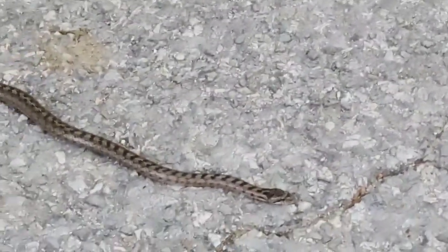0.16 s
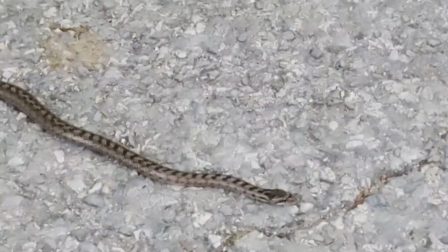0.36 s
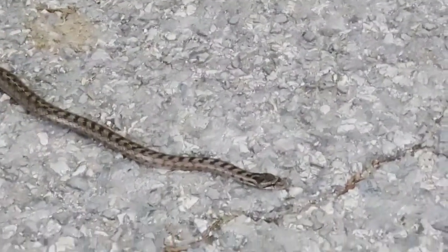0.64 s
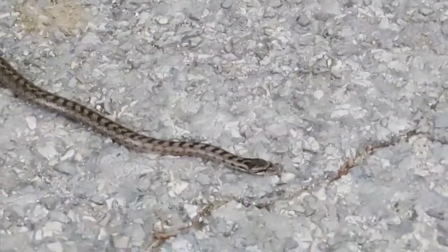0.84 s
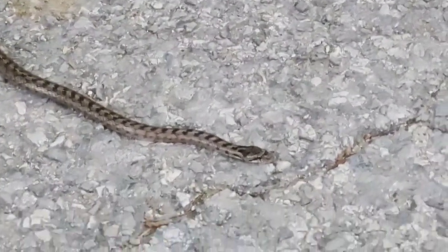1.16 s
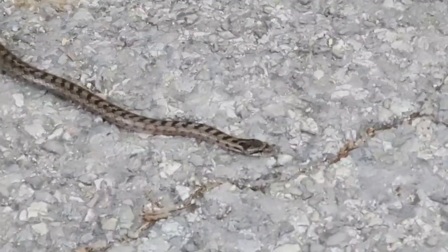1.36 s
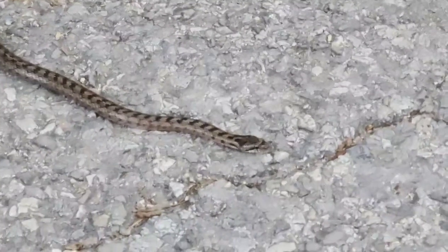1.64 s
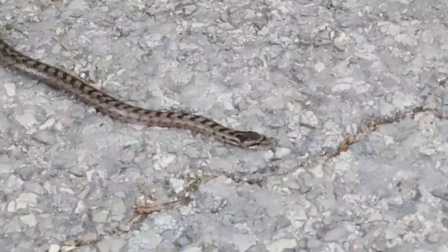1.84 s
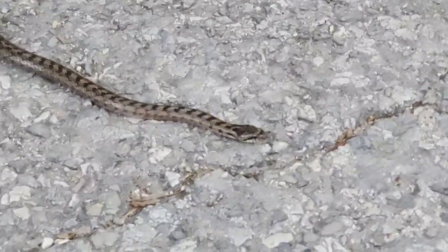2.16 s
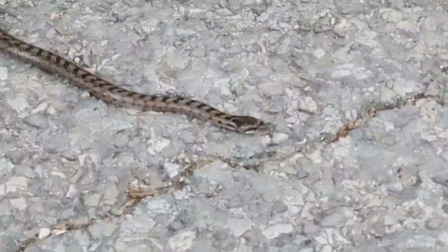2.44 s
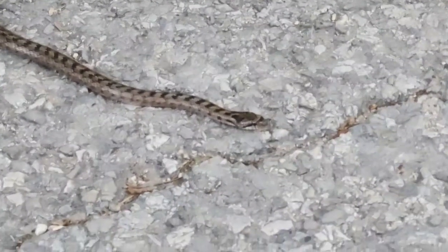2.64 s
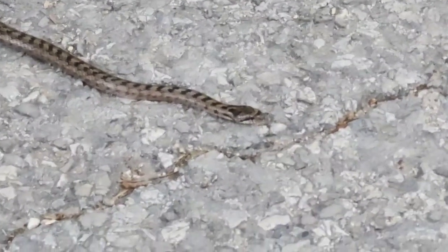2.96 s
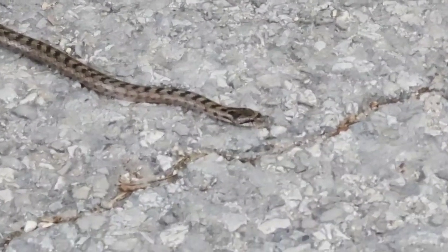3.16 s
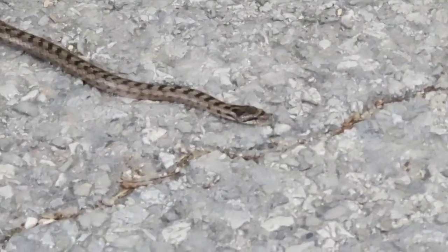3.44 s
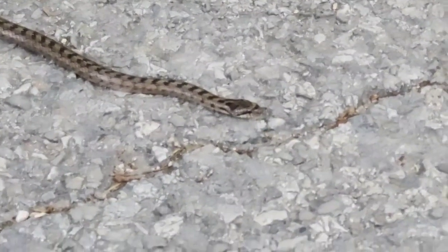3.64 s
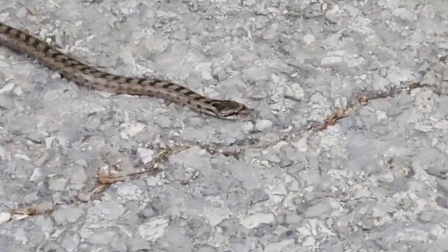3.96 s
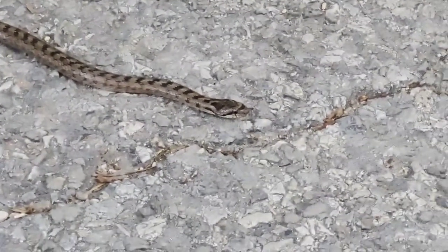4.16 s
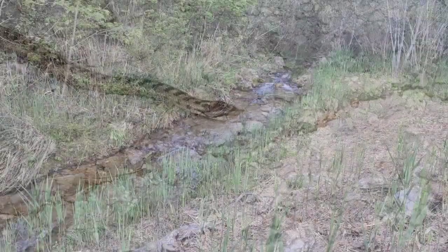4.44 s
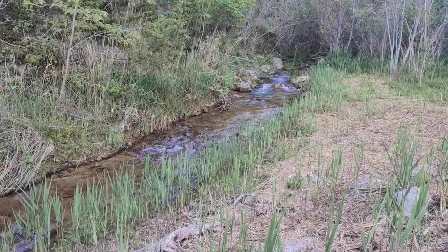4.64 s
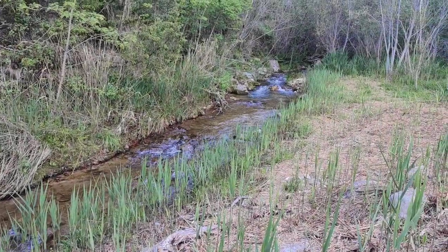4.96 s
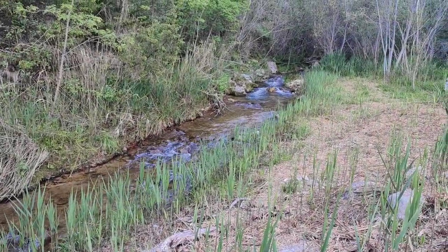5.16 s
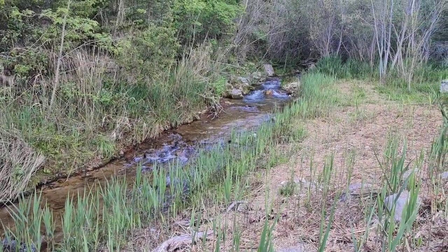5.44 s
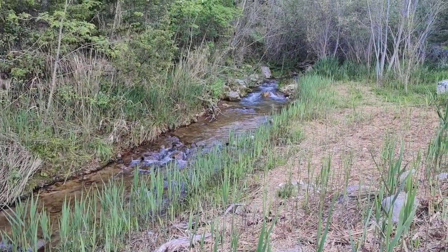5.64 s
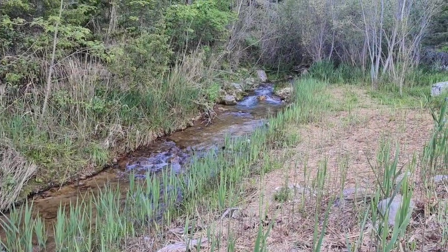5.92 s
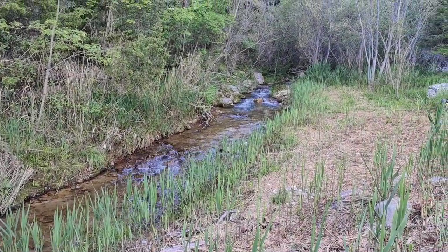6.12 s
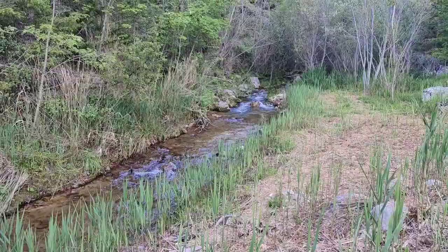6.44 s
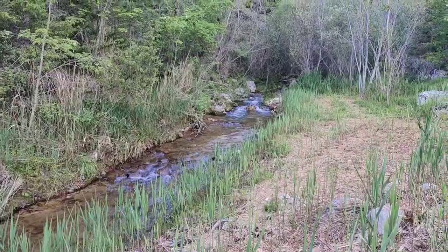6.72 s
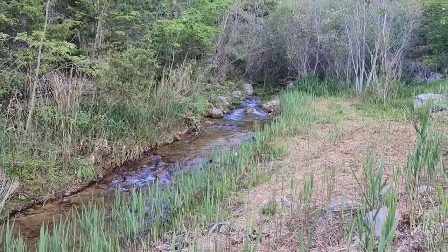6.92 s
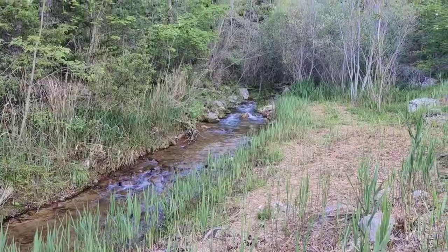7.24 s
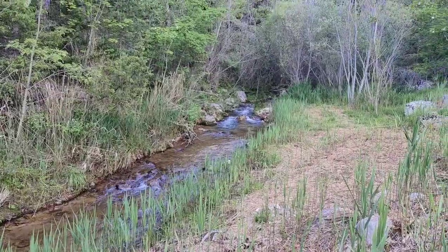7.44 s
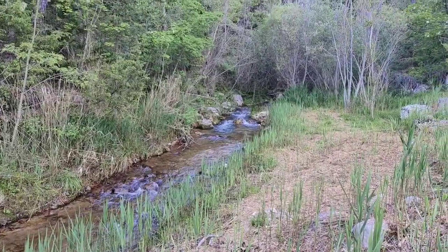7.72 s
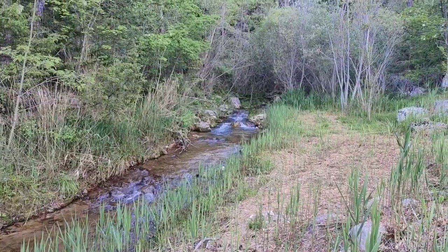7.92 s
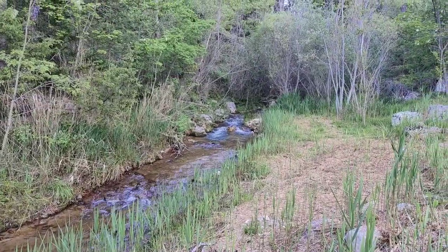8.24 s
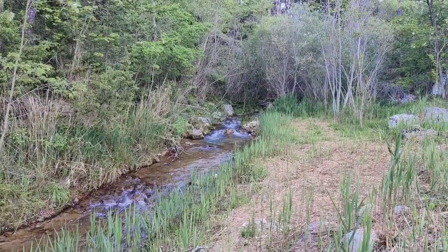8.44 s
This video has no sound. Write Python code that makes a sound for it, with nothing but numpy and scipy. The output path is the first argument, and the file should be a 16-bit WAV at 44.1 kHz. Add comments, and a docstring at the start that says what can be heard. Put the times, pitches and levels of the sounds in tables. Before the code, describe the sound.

From 0 s, songbirds sing loudly in a wood, close and mostly to the right. Short clear whistles slide down, others climb or flick upward, mixed with raspy buzzes and thin high notes around 6 kHz; each hangs in a dense echo of under a second. Quiet low rumble and tiny dry crackles lie beneath. A sharp tick snaps at 0.1 s, with fainter ticks until 2.6 s and soft dull bumps on the microphone around 0.5 to 0.6 s. Soft, low, ringing plips drop irregularly from about 0.8 to 3.9 s. Song stays busy until about 3.6 s, with strong whistles near 3.1 s, then thins. From 4 to 5 s the woodland air fades away and a small brook swells in: a steady, wide, gently surging rush with fizzing and gurgling bubbles. Weaker calls accompany its arrival; only a few faint whistles follow, around 6.6 to 7.8 s, as water continues to the end.

```python
"""Songbirds whistle and buzz close by in a wood, mostly to the right: near-sine glides, roughened by flutter,
that hang on among the trees as a dense decaying tail. Under them lie a low rumble and tiny crackles of
filtered noise; a few sharp ticks and dull bumps, then soft ringing plips, sound near the microphone.
After four seconds the wood fades into a small brook over stones: a rush of noise in which resonant bubbles
fizz and gurgle, with a few faint bird calls behind it."""
import sys
import numpy as np
from scipy import signal
from scipy.fft import rfft, irfft
from scipy.io import wavfile

SR = 44100
rng = np.random.default_rng(int(sys.argv[2]) if len(sys.argv) > 2 else 0)


def to_wav(s):
    """Save 16-bit WAV."""
    ch = np.atleast_2d(s).T  # columns
    pcm = np.round(np.clip(ch, -1, 1) * 32767)  # PCM
    wavfile.write(sys.argv[1], SR, pcm.astype(np.int16))


N = 378819


def from_db(db):
    """Amplitude is the antilogarithm of a twentieth of the level in decibels."""
    return 10 ** (np.asarray(db) / 20)


def rms_one(x):
    """Normalisation: equal mean power for every signal, at unit rms."""
    return x / np.sqrt(np.mean(x ** 2) + 1e-20)


def in_time(rows):
    """Linear interpolation draws an envelope through (time, value) points at every sample."""
    return np.interp(np.arange(N) / SR, *np.transpose(rows))


def at_hz(points, hz):
    """Interpolation of a frequency curve along a logarithmic axis."""
    point_hz, value = np.transpose(points)
    return np.interp(np.log(np.maximum(hz, 1)), np.log(point_hz), value)


def pan(lean_db):
    """Level-difference stereo at constant total power; a positive lean is to the left."""
    gains = from_db(np.array([[.5], [-.5]]) * lean_db)
    return gains / np.sqrt(np.mean(gains ** 2, axis=0))


def add(out, start, sound):
    """Superposition: a stereo sound is summed in from its start time."""
    i = max(0, round(start * SR))
    out[:, i:i + sound.shape[1]] += sound[:, :N - i]


def wander(rate_hz):
    """Band-limited noise: a random modulator of unit rms with nothing faster than the rate."""
    slow = np.fft.rfftfreq(N, 1 / SR) < rate_hz
    return rms_one(irfft(rfft(rng.standard_normal(N)) * slow, N))


# correlation of left and right: pitch_hz, correlation (1 alike, 0 unrelated, negative opposed)
LIKENESS = [(200, 1), (330, .95), (640, .1), (1400, -.35), (2400, -.05), (15000, 0)]
# stereo balance of the broad noises and bubbles: pitch_hz, left_over_right_db
LEAN = [(380, 0), (700, 2.5), (1290, 0), (2380, -2.5), (4400, -9), (8100, -9), (12000, -5.5)]


def wide_noise(spectrum):
    """Interchannel correlation: mid and side noises mix to a set likeness at each frequency; rms 1."""
    hz = np.fft.rfftfreq(N, 1 / SR)
    mid, side = rfft(rng.standard_normal((2, N)))
    alike = np.clip(at_hz(LIKENESS, hz), -1, 1)
    pair = np.sqrt(1 + alike) * mid + np.sqrt(1 - alike) * side * [[1], [-1]]
    shape = pan(at_hz(LEAN, hz)) * from_db(at_hz(spectrum, hz))
    return rms_one(irfft(pair * shape, N))


SLUR_OVERSHOOT, SLUR_RASP_SHARE = 0.35, 0.028   # shares of the fall: a wider slide sinks further, is rougher
SLUR_RASP_HZ = 11


def slur(start, length, hz, fall_hz, level_db):
    """Downward glide: a whistle drops onto its pitch and sinks a little past it."""
    pitches = (hz + fall_hz, hz, hz - SLUR_OVERSHOOT * fall_hz)
    return start, length, pitches, SLUR_RASP_HZ + SLUR_RASP_SHARE * fall_hz, level_db


def buzz(start, length, hz, rasp_hz, level_db):
    """Frequency modulation: wide flutter smears a level note."""
    return start, length, (hz, hz, hz), rasp_hz, level_db


PLUNGE_S, PLUNGE_RASP_HZ = .038, 13
PLUNGE_SPAN = 0.282   # starts this share above the pitch, ends the same interval below


def plunge(start, hz, level_db):
    """Steep glide: a short note dives through its pitch by equal intervals."""
    pitches = (hz * (1 + PLUNGE_SPAN), hz, hz / (1 + PLUNGE_SPAN))
    return start, PLUNGE_S, pitches, PLUNGE_RASP_HZ, level_db


# clear whistles that slide down from above: start_s, length_s, pitch_hz, fall_hz, level_db
SLURS = [(0.0, 0.011, 4760, 40, -19.5), (0.07, 0.13, 3570, 250, -29.5), (0.206, 0.1, 5460, 90, -24),
         (0.373, .11, 4876, 290, -18.5), (0.57, 0.064, 4824, 96, -20), (0.733, 0.1, 3595, 220, -32),
         (1.082, 0.064, 3350, 760, -24.5), (2.75, 0.019, 2820, 440, -27.5), (2.768, 0.041, 2488, 62, -24.5),
         (2.834, 0.068, 3656, 460, -21), (2.968, 0.095, 2462, 66, -27.5), (3.124, 0.069, 3877, 108, -17),
         (3.331, 0.067, 3120, 384, -24), (3.424, 0.039, 3034, 30, -21.5), (3.635, 0.0363, 2502, 111, -33.5),
         (3.883, 0.016, 5550, 250, -57), (3.91, 0.021, 5860, 210, -57), (4.007, .024, 3600, 10, -51),
         (4.025, 0.061, 2860, 720, -34.5), (4.08, 0.057, 2150, 75, -46), (4.176, 0.033, 2040, 230, -37.5),
         (4.254, 0.056, 1780, 64, -34), (4.463, 0.061, 3665, 33, -35), (4.484, .07, 2643, 200, -28),
         (4.498, 0.032, 5320, 150, -45), (6.644, 0.093, 3720, 80, -45.5), (7.149, 0.051, 2950, 60, -41),
         (7.359, 0.09, 3250, 300, -41.5), (7.733, 0.079, 2400, 50, -49)]


def slurs():
    """Downward glides at tabulated times."""
    return [slur(*row) for row in SLURS]


# rough notes: start_s, length_s, pitch_hz, rasp_hz (pitch spread), level_db
BUZZES = [(0.0, 0.012, 7060, 200, -25), (0.083, 0.039, 4180, 160, -23), (0.421, 0.059, 5500, 596, -28.5),
          (0.637, 0.097, 6130, 904, -28), (0.754, 0.098, 4200, 190.3, -22.5),
          (0.779, 0.14, 2665, 254, -32.5), (0.869, 0.083, 5310, 248, -26), (1.16, 0.11, 4200, 510, -36.5),
          (1.175, 0.093, 5570, 300, -31.5), (2.307, 0.037, 3600, 250, -41), (2.618, 0.064, 5680, 170, -32),
          (2.9, 0.095, 3604, 198, -28)]


def buzzes():
    """Flutter-modulated notes at tabulated times."""
    return [buzz(*row) for row in BUZZES]


# thin high whistles: start_s, pitch_hz, level_db
HIGH_NOTES = [(0.03, 6380, -35), (0.195, 6480, -38.5), (1.06, 6334, -24), (1.132, 6407, -21),
              (1.6, 6434, -25.5), (1.72, 6480, -23.5), (2.15, 6430, -22.5), (2.25, 6450, -25.5),
              (2.697, 6394, -23.5), (2.815, 6475, -28.5)]
HIGH_S, HIGH_SAG_HZ, HIGH_RASP_HZ = 0.0767, 170, 55


def high_notes():
    """Slight downward glide: thin whistles sag onto their pitch and past it."""
    notes = []
    for start, hz, level_db in HIGH_NOTES:
        pitches = (hz + HIGH_SAG_HZ, hz, hz - SLUR_OVERSHOOT * HIGH_SAG_HZ)
        notes.append((start, HIGH_S, pitches, HIGH_RASP_HZ, level_db))
    return notes


# evenly climbing whistles: start_s, length_s, pitch_hz (midway), climb_hz, level_db
CLIMBS = [(0.072, 0.13, 1770, 440, -35.5), (0.196, 0.044, 2035, 192, -25), (0.31, 0.1, 2140, 50, -25),
          (0.399, .139, 2270, 152, -24.5), (0.55, 0.11, 2487, 290, -27), (2.459, 0.052, 2794, 785, -28.5),
          (3.835, 0.069, 1714, 130.6, -64.5), (4.246, 0.14, 2535, 364, -44.5),
          (4.336, .088, 3630, 287, -40.5), (6.93, .056, 3450, 400, -44)]
CLIMB_RASP_HZ = 20


def climbs():
    """Linear upward glide about a middle pitch."""
    return [(start, length, (hz - climb / 2, hz, hz + climb / 2), CLIMB_RASP_HZ, level_db)
            for start, length, hz, climb, level_db in CLIMBS]


# quick upward flicks: start_s, pitch_hz (settled), level_db
FLICKS = [(0.355, 3450, -29), (0.945, 4180, -23), (1.294, 4213, -23), (1.465, 4164, -25),
          (1.832, 4160, -26), (1.997, 4153, -25.5), (2.303, 5380, -35), (2.346, 3400, -25),
          (2.374, 4180, -23), (2.5, 3420, -22), (2.558, 4135, -25.5), (2.943, 4203, -28.5),
          (4.39, 2927, -38)]
FLICK_S, FLICK_RISE_HZ, FLICK_RASP_HZ = 0.077, 200, 44


def flicks():
    """Decelerating upward glide: the note flicks up and settles on its pitch."""
    return [(start, FLICK_S, (hz - FLICK_RISE_HZ, hz, hz), FLICK_RASP_HZ, level_db)
            for start, hz, level_db in FLICKS]


# calls of one held note that breaks into a plunge: start_s, level_db
BREAK_CALLS = [(1.24, -24), (1.412, -25.5), (1.607, -24.5)]
HOLD_S, HOLD_HZ, BREAK_HZ = .035, 2843, 2225
BREAK_DB = -9.5   # relative to the held note


def break_calls():
    """Register break: a nearly held note jumps down into a weaker plunge."""
    notes = []
    for start, level_db in BREAK_CALLS:
        notes.append(slur(start, HOLD_S, HOLD_HZ, fall_hz=70, level_db=level_db))
        notes.append(plunge(start + HOLD_S, BREAK_HZ, level_db + BREAK_DB))
    return notes


# a high buzz, a swoop out of it and a low slur: start_s, level_db
FLOURISHES = [(1.81, -26.5), (2.033, -27)]
# the buzz of each flourish: length_s, pitch_hz, rasp_hz
FLOURISH_BUZZ = (0.077, 6670, 480)
# its slurs: delay_s, length_s, pitch_hz, fall_hz, level_db (relative to the buzz)
FLOURISH_SLURS = [(0.053, 0.028, 5230, 250, -1.5), (.069, .065, 2354, 296, -5)]


def flourishes():
    """Overlapping voices: a buzz is joined by two downward glides."""
    notes = []
    for start, level_db in FLOURISHES:
        notes.append(buzz(start, *FLOURISH_BUZZ, level_db))
        for delay, length, hz, fall_hz, part_db in FLOURISH_SLURS:
            notes.append(slur(start + delay, length, hz, fall_hz, level_db + part_db))
    return notes


# notes that plunge steeply: start_s, pitch_hz, level_db
PLUNGES = [(3.198, 2110, -50.5), (3.695, 1960, -54), (4.286, 1550, -39), (4.568, 1914, -37)]


def plunges():
    """Steep glides at tabulated times."""
    return [plunge(*row) for row in PLUNGES]


def song():
    """Every syllable is a pitch contour: start, length, (first, middle, last) pitch, rasp, level."""
    return (slurs() + buzzes() + high_notes() + climbs() + flicks()
            + break_calls() + flourishes() + plunges())


def glide(u, first, middle, last, snap=4.15):
    """Exponential relaxation: the pitch leaves its first value quickly, then settles into a slow slide."""
    def bend(v):
        return 1 - v + v * np.exp(-snap) - np.exp(-snap * v)
    straight = first + (last - first) * u
    return straight + (middle - (first + last) / 2) * bend(u) / bend(0.493)


# echo of the trees: band_hz, t60_s
WOOD_T60 = [(1500, 0.51), (3000, 0.79), (4500, 0.81), (6500, 0.73), (9000, 0.57)]


def trees(x, build_s=0.0016):
    """Diffuse reverberation: trunks and leaves scatter sound into a dense tail, each band dying at its rate."""
    t = np.arange(SR) / SR
    tail, hz = np.zeros((2, SR)), np.fft.rfftfreq(SR, 1 / SR)
    scatter = rfft(rng.standard_normal((2, SR)))
    centres = [f for f, t60 in WOOD_T60]
    for share, (f, t60) in zip(np.eye(len(centres)), WOOD_T60):
        band = irfft(scatter * np.interp(hz, centres, share), SR)   # overlapping triangular bands
        tail += band * from_db(-60 * t / t60)
    tail *= 1 - np.exp(-t / build_s)
    return signal.fftconvolve(x, rms_one(tail) / np.sqrt(SR), axes=1)[:, :N]


# the higher the note, broadly, the further right it sits: pitch_hz, left_over_right_db
BIRD_LEAN = [(1700, -2.5), (2200, -5.5), (2550, -3), (3000, -7), (3500, -11.5), (4200, -14), (5400, -19),
             (6500, -16)]
# the open bank of the brook returns less echo than the wood: time_s, echo_db
ECHO = [(4.6, -2.5), (5.4, -7)]
LEFT_LEAD_S = 3 / SR


def birds(attack_share=0.12, release_share=0.15, buzz_attack=0.16, flutter_hz=330, shimmer_db=1.67,
          beak_hz=1750, direct_db=-3.5, overtone_db=-31, overtone_hz=11350, overtone_width_hz=480):
    """Frequency modulation: each syllable is a near sine that flutter of the syrinx spreads into a buzz."""
    out, shimmer = np.zeros((2, N)), wander(110)
    flutter = rms_one(np.tanh(.5 * wander(flutter_hz)))   # the pitch can only swing so far
    for start, length, (first, middle, last), rasp, level_db in song():
        u = np.linspace(0, 1, int(max(length, .015) * SR))
        now = slice(int(start * SR), int(start * SR) + len(u))
        pitch = glide(u, first, middle, last) + rasp * flutter[now]
        cycles = np.cumsum(pitch) / SR
        left_lead = pitch * LEFT_LEAD_S * np.array([[1], [0]])
        phase = 2 * np.pi * (cycles + left_lead)
        attack = attack_share + buzz_attack * np.tanh(rasp / 400)   # buzzes swell more slowly than whistles
        ramp = np.clip(np.minimum(u / attack, (1 - u) / release_share), 0, 1)
        swell = np.sin(np.pi / 2 * ramp) ** 2
        radiated = 1 / (1 + (beak_hz / pitch) ** 8)   # a small beak radiates low notes poorly
        # the octave sounds only near its resonance
        sheen = from_db(overtone_db) * np.exp(-((2 * pitch - overtone_hz) / overtone_width_hz) ** 2)
        tone = np.sin(phase) + sheen * np.sin(2 * phase)
        tone = tone * swell * radiated * from_db(shimmer_db * shimmer[now])
        add(out, start, from_db(level_db) * rms_one(tone) * pan(at_hz(BIRD_LEAN, middle)))
    return from_db(direct_db) * out + trees(out * from_db(in_time(ECHO)))


# spectrum of the still air of the wood: pitch_hz, density_db (relative, per Hz)
AIR = [(25, -26), (50, -3.5), (90, 0), (200, -7.5), (400, -16.5), (800, -19.5), (1500, -24.5),
       (3000, -15.5), (6000, -25), (9000, -37.5), (13500, -32.5), (15700, -27)]


def crackle(per_s=22, level_db=-14, spread_db=7.0, decay_s=.002, low_hz=450):
    """Random impulses: tiny dry crackles are decaying bursts of high-passed noise at chance times."""
    sizes = from_db(spread_db * np.minimum(rng.exponential(1, N), 3))
    hits = sizes * (rng.random(N) < per_s / SR)
    bursts = signal.lfilter([1], [1, -np.exp(-1 / (decay_s * SR))], hits + 1e-18)
    highpass = signal.butter(2, low_hz, "high", fs=SR, output="sos")
    grain = signal.sosfilt(highpass, wide_noise(AIR))
    return from_db(level_db) * rms_one(bursts * grain)


# the wood's air fades as the brook arrives: time_s, level_db
AIR_LEVEL = [(0, -49), (.8, -47), (2.0, -51), (3.5, -50.5), (3.95, -54), (4.4, -52.5), (4.9, -96),
             (8.6, -90)]


def wood_air():
    """Coloured noise: a low rumble and its crackles share one slow envelope."""
    return from_db(in_time(AIR_LEVEL)) * (wide_noise(AIR) + crackle())


# sharp ticks: start_s, level_db (peak before panning), centre_hz, left_over_right_db
TICKS = [(0.099, -7, 2460, -9), (0.497, -35, 920, 4), (0.630, -23, 4500, -1), (0.903, -32, 6240, -2),
         (1.343, -25, 2610, -5), (1.527, -30.5, 4630, -14), (2.584, -35, 1090, 9)]


def ticks(decay_s=0.0014, width=1.78):
    """Impulsive excitation: dry snaps are a millisecond or two of broad band-passed noise."""
    out, t = np.zeros((2, N)), np.arange(SR // 20) / SR
    for start, level_db, hz, lean_db in TICKS:
        band = signal.butter(2, [hz / width, hz * width], "band", fs=SR, output="sos")
        burst = rng.standard_normal((2, len(t))) * np.exp(-t / decay_s)
        snap = signal.sosfilt(band, signal.sosfilt(band, burst))
        add(out, start, from_db(level_db) * snap / np.abs(snap).max() * pan(lean_db))
    return out


# dull bumps of the hand on the microphone: start_s, level_db (peak), top_hz
BUMPS = [(0.496, -35.5, 230), (0.635, -36, 257)]


def bumps(decay_s=0.0052, low_hz=70):
    """Structure-borne sound: a soft touch travels through the housing and thuds alike in both channels."""
    out, t = np.zeros((2, N)), np.arange(SR // 10) / SR
    for start, level_db, top_hz in BUMPS:
        band = signal.butter(2, [low_hz, top_hz], "band", fs=SR, output="sos")
        thud = signal.sosfilt(band, rng.standard_normal(len(t)) * np.exp(-t / decay_s))
        add(out, start, from_db(level_db) * thud / np.abs(thud).max() * pan(0))
    return out


# fainter plips fall in between, most of them low
PATTER_FROM_S, PATTER_TO_S, PATTER_DB = .75, 3.9, -45.5   # level before the gain of all plips
PATTER_LOW_HZ, PATTER_HIGH_HZ = 345, 1100


def patter(count=16, spread_db=4):
    """Jittered timing: faint plips at loose intervals, as rows of time, level and pitch."""
    when, strength, size = rng.random((count, 3)).T
    starts = PATTER_FROM_S + (PATTER_TO_S - PATTER_FROM_S) * (np.arange(count) + when) / count
    levels_db = PATTER_DB + spread_db * (strength - .5)
    pitches = PATTER_LOW_HZ * (PATTER_HIGH_HZ / PATTER_LOW_HZ) ** (size ** 2)   # squaring favours low
    return list(zip(starts, levels_db, pitches))


# the clearest soft plips: start_s, level_db (before the gain of all plips), pitch_hz
PLIPS = [(0.873, -32.5, 917), (1.138, -32.5, 585), (1.498, -26.5, 940), (1.609, -43, 350),
         (2.017, -43.5, 390), (2.169, -41, 352), (2.573, -36.5, 623), (2.584, -37, 373), (2.734, -41, 360),
         (2.949, -43, 790), (3.033, -40, 1080), (3.233, -41, 810), (3.504, -41.5, 820), (3.548, -43, 677)]


def plips(cycles=13, rise_cycles=1.5, knock_db=-13, knock_s=0.011, gain_db=10.0):
    """Damped resonance: each plip swells and dies by 60 dB in a few cycles, over a short dull knock."""
    out, t = np.zeros((2, N)), np.arange(SR // 10) / SR
    dull = signal.butter(2, [250, 1500], "band", fs=SR, output="sos")
    for start, level_db, hz in PLIPS + patter():
        knock = signal.sosfilt(dull, rng.standard_normal((2, len(t))) * np.exp(-t / knock_s))
        rise = 1 - np.exp(-t * hz / rise_cycles)
        decay = np.exp(-np.log(1000) * t * hz / cycles)
        body = rise * decay * np.sin(2 * np.pi * hz * t)
        plip = body + from_db(knock_db) * knock / np.abs(knock).max()
        add(out, start, from_db(level_db + gain_db) * plip)
    return out


def ring(clicks, hz, t60):
    """Two-pole resonator: a unit click sets a decaying sine of height 1 ringing."""
    r, w = from_db(-60 / (t60 * SR)), 2 * np.pi * hz / SR
    return signal.lfilter([0, np.sin(w)], [1, -2 * r * np.cos(w), r * r], clicks + 1e-18)


# spectrum of the brook's rush: pitch_hz, density_db (relative, per Hz)
RUSH = [(25, -31), (50, -9), (110, 3), (200, -7), (400, -9.5), (690, -3), (950, -7), (1600, -10.5),
        (2300, -8), (3050, -13), (6600, -11), (8500, -21), (13600, -27.5), (15700, -28.5)]


def bubbles(low_hz, high_hz, per_s, cycles, spread_db=2.5, scatter_db=2.5, count=30):
    """Bubble resonance: air trapped behind the stones rings at the pitch of its size, each from its own spot."""
    out = np.zeros((2, N))
    for hz in np.geomspace(low_hz, high_hz, count):
        born = rng.integers(0, N, max(1, int(per_s * N / SR / count)))
        sizes = from_db(spread_db * np.minimum(rng.exponential(1, len(born)), 3))
        spots = pan(at_hz(LEAN, hz) + scatter_db * rng.standard_normal(len(born)))
        clicks = np.zeros((2, N))
        clicks[:, born] = sizes * spots * rng.choice([-1, 1], (2, len(born)))
        ringing = rms_one(ring(clicks, hz, cycles / hz))   # falls 60 dB in this many cycles
        out += ringing * np.sqrt(hz) * from_db(at_hz(RUSH, hz))   # root hz: bands widen with pitch
    return rms_one(out)


# the brook fades in: time_s, level_db (common to its three parts)
FLOW = [(0, -110), (4.0, -77), (4.25, -52.5), (4.5, -43.5), (4.8, -39.5), (5.3, -37.5), (6.3, -37),
        (7.5, -36.5), (8.6, -36.5)]


def brook(fizz_db=-10.0, gurgle_db=-12.5, rush_db=0.5, surge_db=0.64, surge_hz=22):
    """Random superposition: far splashes merge into a surging rush; small bubbles fizz, large ones gurgle."""
    rush = from_db(rush_db + surge_db * wander(surge_hz)) * wide_noise(RUSH)
    fizz = from_db(fizz_db) * bubbles(low_hz=1096, high_hz=7070, per_s=1400, cycles=33)
    gurgle = from_db(gurgle_db) * bubbles(low_hz=463.3, high_hz=1312, per_s=90, cycles=110)
    return from_db(in_time(FLOW)) * (rush + fizz + gurgle)


def scene():
    """Linear superposition: birds and small sounds over the air of the wood, then the brook."""
    return birds() + wood_air() + ticks() + bumps() + plips() + brook()


MONO_BELOW_HZ = 400   # the two microphone ports hear the same bass
CUTOFF_HZ = 15600


def record(dry):
    """Mid-side filtering: the bass is the same in both channels; a steep low-pass cuts the top."""
    mid, side = (dry[0] + dry[1]) / 2, (dry[0] - dry[1]) / 2
    hz = np.fft.rfftfreq(N, 1 / SR)
    side = irfft(rfft(side) * (1 - 1 / (1 + (hz / MONO_BELOW_HZ) ** 4)), N)
    lowpass = signal.ellip(12, .1, 80, CUTOFF_HZ, fs=SR, output="sos")
    return signal.sosfilt(lowpass, [mid + side, mid - side])


dry = scene()
out = record(dry)
to_wav(out)
```